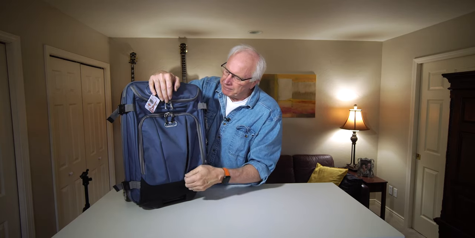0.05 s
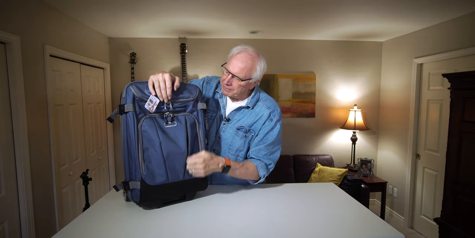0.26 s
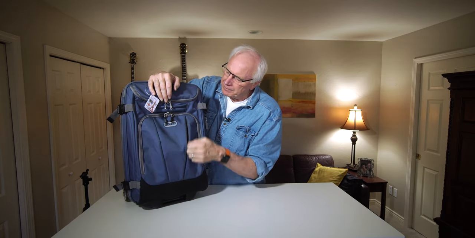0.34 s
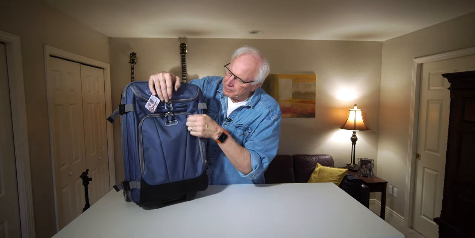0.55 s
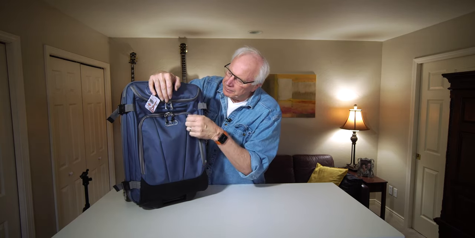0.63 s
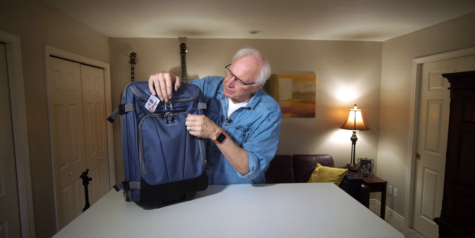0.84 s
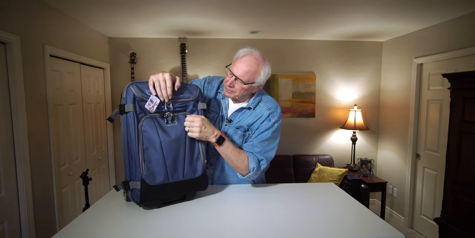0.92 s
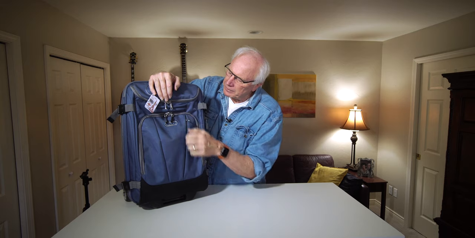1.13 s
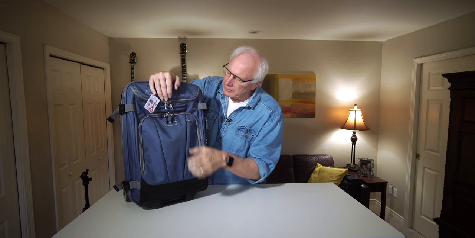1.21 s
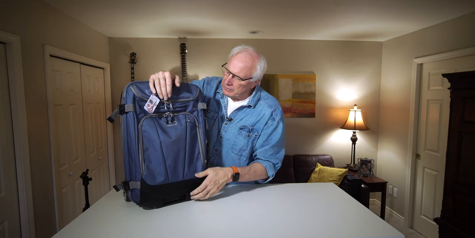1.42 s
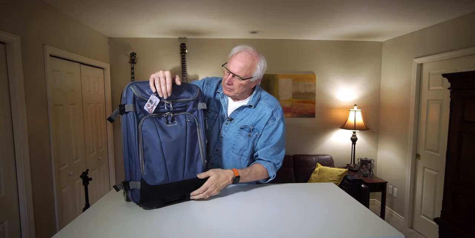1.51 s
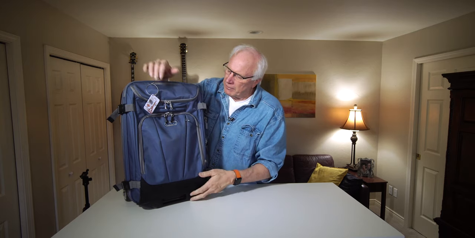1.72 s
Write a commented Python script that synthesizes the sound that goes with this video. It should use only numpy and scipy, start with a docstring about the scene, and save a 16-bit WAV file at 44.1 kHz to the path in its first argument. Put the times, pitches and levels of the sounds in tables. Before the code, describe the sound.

A suitcase zipper is pulled once, close up in a quiet furnished room. Separate ticks start at about 0.15 s, becoming a fast, uneven, raspy buzz from 0.23 s that slows and fades by 0.7 s. The pull tab clicks lightly at 0.74 s. Soft hand bumps follow at 0.85 and 1.27 s, then a cluster of knocks and a cloth scuff around 1.4-1.6 s, with rubbing to the end over faint room tone.

```python
"""Quiet furnished room, microphone close to a suitcase: one pull of its zipper.
The slider ticks over the first teeth, buzzes faster, then slows to a stop; tooth impulses ring tape and panel.
The pull tab clicks: an impulse through resonances. A hand bumps the bag (decaying sines) and rubs and
scuffs its cloth (shaped noise), mostly after the pull. A short tail and steady room tone lie beneath."""
import sys
import numpy as np
from scipy import signal
from scipy.fft import rfft, irfft, next_fast_len
from scipy.io import wavfile
from scipy.ndimage import map_coordinates

SR = 44100
rng = np.random.default_rng(int(sys.argv[2]) if len(sys.argv) > 2 else 0)


def transcribe(u):
    """Save the signal u as a 16-bit wav file named by the first command-line argument.

    u: samples, shape (n,) or (channels, n), limited to [-1, 1]; the rate is SR.
    q: integer samples, one column per channel.
    """
    v = np.clip(np.atleast_2d(u).T, -1, 1)
    q = np.round(v * 32767).astype(np.int16)
    wavfile.write(sys.argv[1], SR, q)


N = 77175

# First teeth, singly: (time [s], force [dB])
FIRST_TEETH = [(0.1526, -3.5), (0.1799, -2), (0.192, -4.5), (0.207, 3), (0.222, 5), (0.234, 6)]
# Slider motion: (time [s], mean tooth rate [1/s], mean force [dB], unevenness [0-1])
PULL_MOTION = [(.234, 670, -9, .45), (.258, 690, -5.5, 0.9), (.277, 605, -4.5, .55), (.301, 560, -0.5, .5),
               (.308, 660, -13.5, .3), (.312, 695, 5.5, 0.1), (.326, 705, -0.5, .1), (.333, 850, 2.5, 0.6),
               (.347, 885, -6.5, 0.5), (.353, 890, -4.5, 0.49), (.36, 885, -6, .9), (.38, 880, -5.5, .9),
               (.39, 850, -3.5, 0.66), (.432, 805, -4.5, .6), (.47, 760, -10, 0.9), (.499, 830, -4.5, 0.7),
               (.509, 755, -0.5, 0.3), (.535, 738, 0, 0.3), (.548, 535, 2, .3), (.563, 500, -6.5, 0.7),
               (.595, 350, -7.5, 0.8), (.635, 230, -9.5, .5), (.652, 168, -22, .8), (.69, 81, -25, 0.5)]
# Force imbalance of the two tooth rows: (time [s], difference [dB])
ROW_IMBALANCE = [(.24, 2), (.285, 11), (.32, 0.5), (.36, 4.5), (.43, 10.5), (.49, 8), (.52, -1.5), (.6, 6)]
# Ring of the taut tape along the travel: (time [s], pitch [Hz])
TAPE_PITCH = [(.15, 689), (.25, 699), (.29, 661), (.32, 670), (.35, 858), (.49, 878), (.515, 815),
              (.6, 718)]
# Bag panel modes: (centre [Hz], width [Hz], relative level [dB])
PANEL_MODES = [(293, 27, -3.5), (335.4, 18, 1.5), (412, 78, -0.5), (444, 13, -14.5), (534, 60, -10.5),
               (1270, 380, -15.5), (1486, 185, -15.5), (2220, 240, -23.5), (2730, 1400, -28)]
# Slider rasp on the teeth: (time [s], reference level [dB])
RASP_LEVEL = [(.13, -100), (.2, -60), (.25, -60.5), (.3, -58), (.36, -51.5), (.44, -51.5), (.525, -52.5),
              (.555, -55.5), (.625, -59), (.66, -72), (.72, -84)]
# Rasp spectrum: (frequency [Hz], relative level [dB])
RASP_SPECTRUM = [(500, 4.5), (1200, 14), (1900, 3.5), (2900, -0.5), (4000, -5), (5000, -3), (6000, -1),
                 (7200, 0), (9000, -6.5), (11000, -12.5), (15500, -18.5)]
# Slack cloth flapping as the slider slows: (time [s], level [dB])
SLACK_LEVEL = [(.52, -87), (.55, -47.5), (.6, -47), (.635, -46), (.665, -56), (.72, -72), (.8, -85)]
# Slack cloth spectrum: (frequency [Hz], relative level [dB])
SLACK_SPECTRUM = [(60, -13), (150, -6), (220, -6), (300, 7), (355, -10.5), (500, -9), (1500, -79)]
# Pull tab impulses: (time [s], level [dB])
TAB_TAPS = [(.736, -18.5)]
# Pull tab modes: (centre [Hz], width [Hz], relative level [dB])
TAB_MODES = [(3200, 770, -11), (5700, 640, 2), (6500, 680, 1), (7900, 1000, -9)]
# Hand bumps: (time [s], peak [dB], pitch [Hz], t60 [s], cloth snap level [dB])
HAND_BUMPS = [(0.221, -48, 153, 0.11, -71), (.845, -53, 201, 0.11, -77), (1.272, -44, 251, 0.025, -63.5),
              (1.374, -44.5, 347, 0.027, -63), (1.4482, -42, 680, 0.0099, -73),
              (1.472, -42, 219, 0.04, -63.5), (1.516, -42, 1100, 0.0048, -71),
              (1.544, -61, 170, 0.026, -59.5), (1.738, -50.5, 1230, 0.044, -54.5)]
# Cloth rubbing: (time [s], hiss level [dB], mean body level [dB])
RUB_LEVELS = [(0, -71, -70.5), (.14, -92, -68.5), (.7, -76, -63), (.76, -70, -72), (.79, -79, -63.5),
              (.85, -70, -64.5), (.93, -81, -68.5), (1, -73.5, -78), (1.05, -69, -77), (1.1, -84, -64),
              (1.23, -83, -67.5), (1.36, -79, -65), (1.45, -80, -62.5), (1.49, -74, -64.5),
              (1.56, -69, -62.5), (1.64, -62.5, -62), (1.71, -63.5, -67), (1.75, -63.5, -53.5)]
# Rub hiss spectrum: (frequency [Hz], relative level [dB])
HISS_SPECTRUM = [(500, -18), (1400, 6.5), (2800, -4), (4200, -2), (7000, 2.5), (10000, -6), (15500, -14)]
# Rub body spectrum: (frequency [Hz], relative level [dB])
BODY_SPECTRUM = [(40, 3), (160, 0.5), (400, -4.5), (700, -5), (1500, -17.5), (3000, -18), (6000, -43)]
# Handling rumble: (time [s], level [dB])
RUMBLE_LEVEL = [(0, -75), (.15, -66.5), (.3, -56.5), (.42, -64), (.5, -51.5), (.62, -73), (.76, -56),
                (.95, -68), (1.05, -58), (1.17, -66), (1.36, -55), (1.5, -60), (1.75, -57.5)]
# Rumble spectrum: (frequency [Hz], relative level [dB])
RUMBLE_SPECTRUM = [(8, -25), (25, -2), (55, 0), (90, -10), (200, -28), (800, -70)]
# Palm scuff on the cloth: (time [s], mean level [dB])
SCUFF_LEVEL = [(1.466, -100), (1.474, -66.5), (1.57, -66.5), (1.63, -77)]
# Scuff resonances, per pass: (centre [Hz], width [Hz], relative level [dB])
SCUFF_RESONANCES = [(1440, 420, 0), (2950, 450, -3.1)]
# Room tone spectrum: (frequency [Hz], relative level per Hz [dB])
FLOOR_SPECTRUM = [(18, -46), (30, -22.5), (173, -1), (299, -14), (332, -8), (606, -12.5), (1170, -21.5),
                  (1510, -16.5), (2070, -20.5), (3070, -20.5), (15500, -25)]
# Left-right likeness of the room tone: (frequency [Hz], correlation)
FLOOR_CORRELATION = [(30, 0), (100, .65), (600, .7), (2000, .45), (6000, .35), (14000, .25)]

# At full unevenness
TOOTH_SCATTER_DB, FORCE_WOBBLE_DB = 3, 4.5
SPACING_SCATTER, LOG_SPEED_WOBBLE = .14, .13  # in tooth spacings; in ln(rate)
STUTTER_KNOTS_PER_S = 259.9
TAPE_T60_S, TAPE_ATTACK_S, TAPE_DB = 0.017, 0.0012, -36.5
PANEL_DB = -4.5
BAG_LOW_HZ, BAG_HIGH_HZ = 250, 2980  # band in which the bag radiates the knocks
CLICK_LIFE_S, CLICK_SCATTER_DB = .0005, 2.5
CLICK_DB, SLIDE_DB = 0, -2  # relative to the rasp level
FIRST_CLICK_LIFE_S, FIRST_CLICK_DB = .0035, -57
SNAP_T60_S = 0.026
WEAVE_KNOTS_PER_S, WEAVE_DB = 898, 2  # cloth catches in small grains
BODY_KNOTS_PER_S, BODY_WOBBLE_DB = 70, 2.1
SCUFF_KNOTS_PER_S, SCUFF_WOBBLE_DB = 160, 2
ROOM_T60_S, ROOM_DELAY_S, ROOM_DB = 0.19, .004, -11
FLOOR_DB = -66.5
TOP_HZ = 15800


def amp(db):
    """Decibels to gain."""
    return 10 ** (np.asarray(db) / 20)


def unit(x):
    """Scale to rms 1."""
    return x / np.sqrt(np.mean(x ** 2) + 1e-20)


def along(points, hz):
    """Interpolate (Hz, value) points on a log frequency axis."""
    f, v = np.transpose(points)
    return np.interp(np.log(hz + 1), np.log(f + 1), v)


def curves(rows):
    """One value per sample for each column after the time."""
    s, *cols = np.transpose(rows)
    return [np.interp(np.arange(N) / SR, s, c) for c in cols]


def wobble(knots_per_s):
    """Smooth random curve through normally distributed knots."""
    return map_coordinates(rng.standard_normal(N), [np.arange(N) * knots_per_s / SR])


def filtered(x, response):
    """Apply a response of frequency, zero-padded against wrap-around."""
    m = next_fast_len(N + SR // 2)
    return irfft(rfft(x, m) * response(np.fft.rfftfreq(m, 1 / SR)), m)[..., :N]


def noise(spectrum, gate=1):
    """Coloured noise of rms 1, gated before it is coloured."""
    white = gate * rng.standard_normal(N)
    return unit(filtered(white, lambda hz: amp(along(spectrum, hz))))


def ring(x, modes):
    """Parallel second-order resonances of a body, alternating in sign."""
    def response(f):
        total = 0
        for k, (centre, width, db) in enumerate(modes):
            damping = 1j * f * width
            total = total + (-1) ** k * amp(db) * damping / (centre * centre - f * f + damping)
        return total
    return filtered(x, response)


def pulses(times, sizes):
    """One impulse at each time."""
    samples = np.round(np.asarray(times) * SR).astype(int)
    return np.bincount(np.clip(samples, 0, N - 1), sizes, N)


def fading(x, life_s):
    """Each impulse becomes an exponential decay, down to 1/e after life_s."""
    return signal.lfilter([1], [1, -np.exp(-1 / (life_s * SR))], x)


def zipper():
    """Tooth knocks drive tape and panel; tooth clicks, slider hiss and slack cloth add noise."""
    times, force, rate = teeth()
    first_s, first_db = np.transpose(FIRST_TEETH)
    first = pulses(first_s, amp(first_db))
    knocks = first + pulses(times, force)
    buzz = tape(knocks) + amp(PANEL_DB) * ring(knocks, PANEL_MODES)
    bag_band = signal.butter(2, [BAG_LOW_HZ, BAG_HIGH_HZ], "bandpass", fs=SR, output="sos")
    buzz = signal.sosfilt(bag_band, buzz)
    ticks = amp(FIRST_CLICK_DB) * fading(np.sqrt(first), FIRST_CLICK_LIFE_S) * noise(RASP_SPECTRUM)
    slack = amp(curves(SLACK_LEVEL)[0]) * noise(SLACK_SPECTRUM)
    return buzz + rasp(times, rate) + ticks + slack


def teeth():
    """Times, forces and rates from integrated speed; rows alternate and the pull stutters."""
    rate, force_db, uneven = curves(PULL_MOTION)
    t = np.arange(N) / SR
    moving = (t > PULL_MOTION[0][0]) & (t < PULL_MOTION[-1][0])
    speed = rate * np.exp(LOG_SPEED_WOBBLE * uneven * wobble(STUTTER_KNOTS_PER_S))
    travel = np.cumsum(moving * speed) / SR  # in teeth
    k = np.arange(1, int(travel[-1]))
    at = np.searchsorted(travel, k)
    shift, size = rng.standard_normal((N, 2))[k].T * uneven[at]
    force_db = force_db + FORCE_WOBBLE_DB * uneven * wobble(STUTTER_KNOTS_PER_S)
    row_db = (-1) ** k * curves(ROW_IMBALANCE)[0][at] / 2
    tooth_db = force_db[at] + TOOTH_SCATTER_DB * size + row_db
    return t[at] + SPACING_SCATTER * shift / rate[at], amp(tooth_db), rate[at]


def tape(knocks):
    """Knocks excite a damped resonance at the tape's moving pitch, with a soft attack."""
    turn = np.exp(2j * np.pi * np.cumsum(curves(TAPE_PITCH)[0]) / SR)
    push = fading(knocks / turn, TAPE_ATTACK_S) / (TAPE_ATTACK_S * SR)
    return amp(TAPE_DB) * np.imag(turn * fading(push, TAPE_T60_S / np.log(1000)))


def rasp(times, rate):
    """Noise clicks decay at each tooth; continuous noise is the slider's hiss between them."""
    level_db, = curves(RASP_LEVEL)
    scatter = amp(CLICK_SCATTER_DB * rng.standard_normal(len(times)))
    # Smaller clicks at higher rates
    gate = fading(pulses(times, scatter / np.sqrt(rate)), CLICK_LIFE_S)
    # Level referred to the pull, not the whole scene
    clicks = noise(RASP_SPECTRUM, gate) * np.sqrt(np.ptp(times) * SR / N)
    return amp(level_db) * (amp(CLICK_DB) * clicks + amp(SLIDE_DB) * noise(RASP_SPECTRUM))


def tab():
    """The metal pull tab taps the slider once: an impulse through its modes."""
    s, db = np.transpose(TAB_TAPS)
    return ring(pulses(s, amp(db)), TAB_MODES)


def hand():
    """Bumps are decaying sines with a noise snap; rubbing and rumble are level-shaped noise."""
    out = np.zeros(N)
    for s, db, hz, t60_s, snap_db in HAND_BUMPS:
        t = np.maximum(np.arange(N) / SR - s, 0)
        out += amp(db - 60 * t / t60_s) * np.sin(2 * np.pi * hz * t)
        out += (t > 0) * amp(snap_db - 60 * t / SNAP_T60_S) * noise(HISS_SPECTRUM)
    hiss_db, body_db = curves(RUB_LEVELS)
    weave = amp(WEAVE_DB * wobble(WEAVE_KNOTS_PER_S))
    out += amp(hiss_db) * noise(HISS_SPECTRUM, weave)
    out += amp(body_db + BODY_WOBBLE_DB * wobble(BODY_KNOTS_PER_S)) * noise(BODY_SPECTRUM)
    return out + amp(curves(RUMBLE_LEVEL)[0]) * noise(RUMBLE_SPECTRUM)


def scuff():
    """The palm lands and scrapes the weave: noise passed twice through resonances."""
    scrape = ring(ring(rng.standard_normal(N), SCUFF_RESONANCES), SCUFF_RESONANCES)
    level_db = curves(SCUFF_LEVEL)[0] + SCUFF_WOBBLE_DB * wobble(SCUFF_KNOTS_PER_S)
    return amp(level_db) * unit(scrape)


def room(x):
    """Faint short tail of the furnished room: convolution with decaying noise."""
    t = np.arange(SR // 2) / SR
    tail = rng.standard_normal(len(t)) * amp(-60 * t / ROOM_T60_S) * (t > ROOM_DELAY_S)
    return amp(ROOM_DB) * signal.fftconvolve(x, tail / np.linalg.norm(tail))[:N]


def floor():
    """Room tone and microphone hiss; mid/side balance sets left-right correlation by frequency."""
    def mid_side_gains(hz):
        angle = np.arccos(np.clip(along(FLOOR_CORRELATION, hz), -1, 1)) / 2
        return np.array([np.cos(angle), np.sin(angle)])
    sources = np.array([noise(FLOOR_SPECTRUM), noise(FLOOR_SPECTRUM)])
    mid, side = filtered(sources, mid_side_gains)
    return amp(FLOOR_DB) * np.array([mid + side, mid - side])


def scene():
    """Bag and its room tail in the centre, over the stereo floor."""
    bag = zipper() + tab() + hand() + scuff()
    return bag + room(bag) + floor()


def record(dry):
    """Remove everything from TOP_HZ up."""
    return filtered(dry, lambda hz: hz < TOP_HZ)


dry = scene()
out = record(dry)
transcribe(out)
```